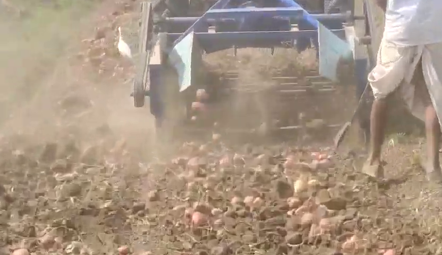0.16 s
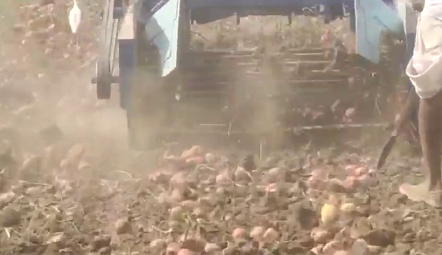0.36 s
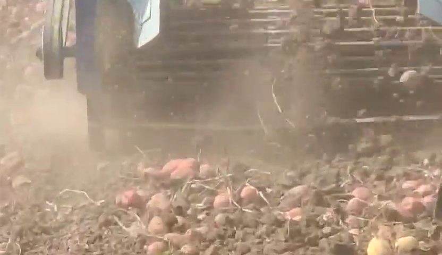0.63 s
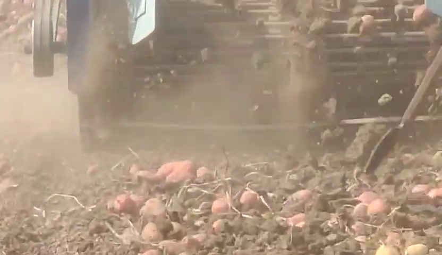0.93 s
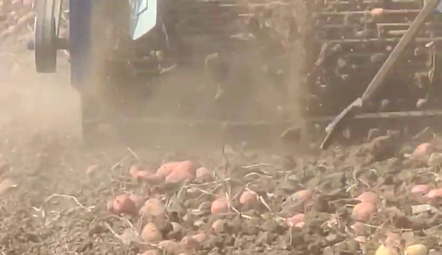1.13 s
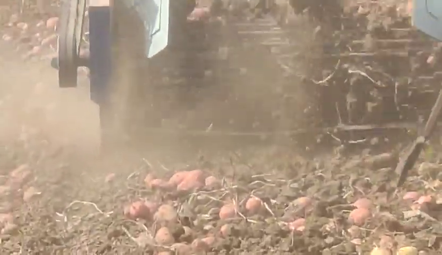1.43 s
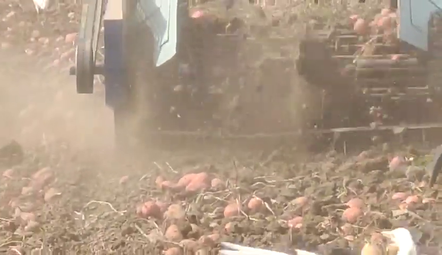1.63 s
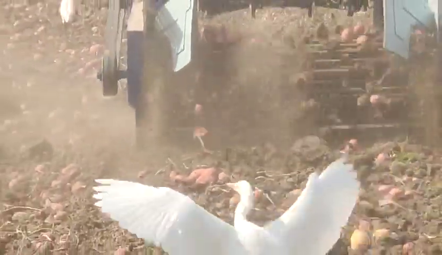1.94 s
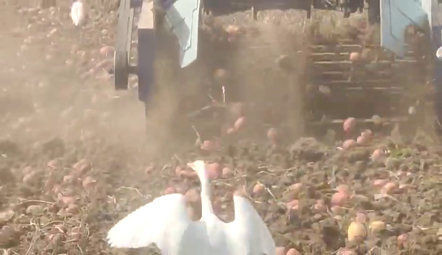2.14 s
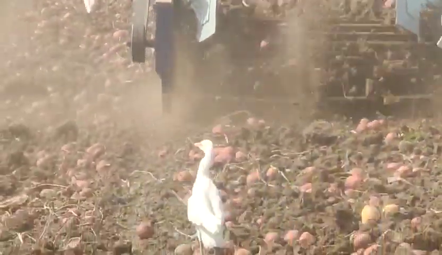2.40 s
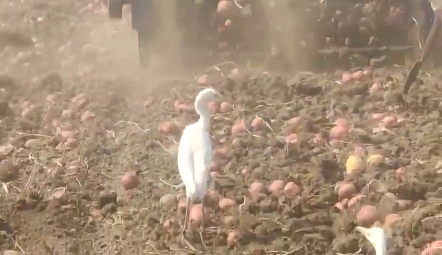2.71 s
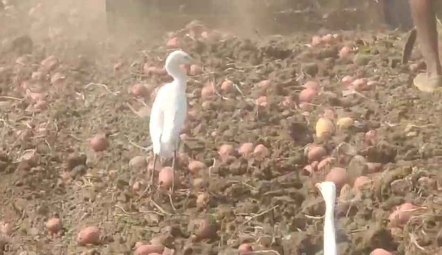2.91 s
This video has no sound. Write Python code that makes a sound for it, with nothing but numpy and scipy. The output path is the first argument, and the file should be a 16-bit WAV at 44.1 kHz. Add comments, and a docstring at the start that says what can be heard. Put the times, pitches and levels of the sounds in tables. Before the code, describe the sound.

A tractor's diesel engine drones low and steady a few metres away for all three seconds, swelling around 0.5 seconds. Its potato digger rattles throughout, with trickling soil and irregular knocks on steel. Short metallic pings come mostly in the first second, and clanks and pattering clods cluster near 2.9 seconds. Light wind rumbles on the microphone, thumping hardest at about 1.3 seconds.

```python
"""Tractor and potato digger

A tractor pulls a potato digger through a dry field, a few metres ahead of the microphone.
The diesel drones at orders of its nearly steady firing rate. Impacts excite the digger's resonances:
its rod chain clatters and pings, clods knock on its steel, and soil trickles through.
A light wind buffets the two microphone ports with turbulent pressure."""
import sys
import numpy as np
from scipy import signal
from scipy.fft import rfft, irfft
from scipy.io import wavfile

SR = 44100
rng = np.random.default_rng(int(sys.argv[2]) if len(sys.argv) > 2 else 0)


def unload_wav(signal):
    """Save mono or channel-first audio to the path in sys.argv[1] as 16-bit WAV at rate SR, clipped to [-1, 1]."""
    wavfile.write(
        sys.argv[1],
        SR,
        np.round(np.clip(np.atleast_2d(signal).T, -1, 1) * 32767).astype(np.int16),
    )


N = 134946

# engine speed (time [s], firing rate [Hz])
FIRING_RATE = [(0, 36.1), (.5, 35.85), (1.3, 35.7), (1.5, 36), (3.06, 36.4)]
def firing_cycles():
    """Phase is the integral of frequency: the count of firings so far."""
    return np.cumsum(curve(FIRING_RATE)) / SR


# exhaust line spectrum (frequency [multiple of the firing rate], relative level [dB])
EXHAUST_ORDERS = [(1, -26), (2, 3), (3, -3), (4, -26.5), (5, -21.5), (6, -41), (8, -34), (8.6, -31.5),
                  (10, -35), (11, -36), (13, -32.5), (14, -31), (16, -28), (20, -31)]
# drone of the three lowest orders (time [s], level [dB])
DRONE_LEVEL = [(0, -45.5), (.1, -46.5), (.19, -55.5), (.25, -42.5), (.44, -38), (.46, -31), (.54, -25.5),
               (.64, -35.5), (.71, -30.5), (.78, -35.5), (.93, -35.5), (1.06, -30), (1.15, -36.5),
               (1.27, -29), (1.37, -38.5), (1.93, -41), (2.07, -35), (2.75, -35.5), (3.06, -38)]
def exhaust(cycles):
    """Periodic gas pulses give a line spectrum: strong low orders, faint unsteady ones above."""
    lines = [amp(db) * np.cos(2 * np.pi * order * cycles) for order, db in EXHAUST_ORDERS]
    low = sum(line * (1 + 0.085 * waver(hz=6.4)) for line in lines[:3])
    high = sum(line * (1 + 0.47 * waver(hz=6.4)) for line in lines[3:])
    return amp(curve(DRONE_LEVEL)) * unit_power(low) + amp(-38) * high


# muffler response (frequency [Hz], relative level [dB])
BOOM_SPECTRUM = [(40, -22.5), (100, -0.5), (140, -1.5), (180, 3), (200, -2.5), (235, -17.5), (400, -27.5),
                 (1000, -59)]
# muffler boom (time [s], level [dB])
BOOM_LEVEL = [(0, -59), (.24, -60.5), (.5, -46.5), (1.1, -51), (1.45, -54), (1.87, -58), (2.15, -48.5),
              (2.53, -57.5), (2.73, -47.5), (3.06, -52)]
def muffler():
    """Cavity resonance shapes noise into a low boom."""
    return excite(amp(curve(BOOM_LEVEL)), BOOM_SPECTRUM)


# response of block and gears (frequency [Hz], relative level [dB])
BLOCK_SPECTRUM = [(30, -16), (90, 2), (185, -2), (245, -11), (310, -10), (410, -11.5), (540, -3),
                  (730, 1.5), (900, -5), (1270, -12), (1700, -8), (1920, -12.5), (2250, -5.5),
                  (2420, -14.5), (2600, -26.5), (4000, -25.5), (15000, -57)]
# mechanical noise (time [s], relative level [dB])
BLOCK_LEVEL = [(0, -53), (.22, -54), (.33, -51), (.45, -54.5), (.8, -55), (.95, -53), (1.1, -53),
               (1.3, -54.5), (1.42, -53.5), (1.6, -53.5), (1.76, -54.5), (1.95, -52.5), (2.1, -55.5),
               (2.5, -56), (2.85, -54), (3.06, -53.5)]
def engine_block(cycles, depth=0.13, gain_db=1):
    """Amplitude modulation: the mechanical noise throbs with each firing."""
    throb = unit_power(1 + depth * np.cos(2 * np.pi * cycles))
    return excite(throb * amp(curve(BLOCK_LEVEL) + gain_db), BLOCK_SPECTRUM)


def rattle(ticks_per_s=280, decay_s=0.0061, trickle_power=1):
    """Shot-noise envelope: random ticks of rods and crumbs add in power to a steady trickle of soil."""
    onsets = rng.random(N) < ticks_per_s / SR
    ticks = onsets * amp(-3.5 * np.minimum(rng.exponential(1, N), 3))
    power = signal.lfilter([1], [1, -np.exp(-2 / (decay_s * SR))], ticks ** 2)
    return unit_power(np.sqrt(power / power.mean() + trickle_power))


# rod chain and trickling soil (frequency [Hz], relative level [dB])
CHAIN_SPECTRUM = [(300, -19), (1200, -5.5), (1700, 1.5), (2000, 2), (2380, 3.5), (2600, -3.5), (2950, -5.5),
                  (3400, -1), (4200, -2), (5200, -3), (5900, -5.5), (6550, -15), (7600, -7), (8500, -12.5),
                  (9500, -16), (11200, -10.5), (12000, -13), (13100, -22), (14700, -15), (16000, -26)]
# their clatter (time [s], relative level [dB])
CHAIN_LEVEL = [(0, -61.5), (.3, -61), (.57, -64.5), (.72, -61.5), (1, -62.5), (1.22, -60.5), (1.45, -61.5),
               (1.72, -62.5), (1.9, -62), (2.15, -63.5), (2.4, -61.5), (2.72, -62), (3.06, -61)]
def rod_chain(envelope, gain_db=1.5):
    """Short, hard contacts excite a broad band of resonances: a bright clatter."""
    return excite(envelope * amp(curve(CHAIN_LEVEL) + gain_db), CHAIN_SPECTRUM)


# clods and rods striking the digger (time [s], relative ring, clack and grit levels [dB], decay [s])
IMPACTS = [(.076, -47.5, -52.5, -65, 0.0068), (0.186, -50, -53.5, -70, 0.01), (.286, -47, -58, -74, .009),
           (.333, -54, -51, -73, 0.01), (0.369, -58, -63, -63, .008), (.486, -63, -57, -75, 0.011),
           (0.622, -63, -56, -61, 0.0041), (0.671, -49, -51.5, -68, 0.027), (0.736, -50, -52.5, -63, 0.02),
           (.761, -49, -72, -78, 0.018), (0.844, -50, -57.5, -71, .008), (0.898, -47, -52.5, -64, 0.016),
           (1.154, -53, -54.5, -66, 0.012), (1.203, -59, -54, -75, 0.012), (1.241, -51, -53.5, -75, 0.0086),
           (1.262, -50, -62, -77, 0.025), (1.3, -63, -52.5, -51.5, 0.012),
           (1.427, -52.5, -54.5, -57, 0.0049), (1.578, -66, -55.5, -73, 0.0056),
           (1.616, -50, -47.5, -63, 0.0039), (1.663, -60, -63, -59, 0.006),
           (1.794, -55, -53.5, -61, 0.0079), (1.82, -53, -63, -63, 0.0069), (1.925, -64, -56.5, -72, .012),
           (2.034, -65, -58, -61, .007), (2.232, -74, -64, -61, 0.0044), (2.269, -52, -56, -66, 0.006),
           (2.326, -53, -61, -73, .01), (2.413, -54, -55.5, -76, .008), (2.594, -50.5, -53.5, -69, 0.016),
           (2.818, -53, -55, -61, 0.0086), (2.856, -53, -49, -59, 0.0049), (2.914, -55, -52, -59, .005),
           (2.926, -51, -47.5, -55, 0.0074), (3.018, -49, -52, -74, .015)]
# steel ring, clack and grit spray, each (frequency [Hz], relative level [dB])
RING_SPECTRUM = [(200, -35), (700, -10.5), (1250, -12), (1660, -6.5), (1900, -15.5), (2110, -2.5),
                 (2230, -11), (2390, -2), (2480, -19.5), (2600, -18.5), (4000, -46)]
CLACK_SPECTRUM = [(1000, -35), (2000, -5), (2900, -6), (3600, 1), (4400, -2), (5100, -2.5), (6000, -7),
                  (6600, -16), (10000, -32)]
GRIT_SPECTRUM = [(3000, -33), (6600, -6), (7600, 3.5), (9000, -6.5), (11200, 0), (13000, -23.5),
                 (15000, -2.5)]
def knocks(rise_s=0.0043):
    """Impact excitation: each crumbling blow rings the steel, clacks and sprays grit."""
    power = np.zeros((3, N))
    for start, ring_db, clack_db, grit_db, decay in IMPACTS:
        gains = amp([[ring_db + 0.5], [clack_db], [grit_db - 0.5]])
        power += (gains * blow(start, rise_s, decay)) ** 2
    spectra = RING_SPECTRUM, CLACK_SPECTRUM, GRIT_SPECTRUM
    return sum(excite(np.sqrt(p), spectrum) for p, spectrum in zip(power, spectra))


# sieve rods striking their guide (time [s], level [dB], frequency [Hz], decay [s])
ROD_STRIKES = [(.232, -54, 2390, 0.023), (0.283, -45.5, 2385, 0.012), (.331, -47, 2400, 0.018),
               (.478, -52, 2420, 0.026), (0.668, -48.5, 2410, 0.023), (0.734, -46, 2350, 0.024),
               (.758, -48.5, 2140, .014), (.936, -55, 2390, .02), (1.264, -52, 2080, 0.021),
               (1.617, -47, 2397, 0.0076)]
def rod_pings(rise_s=0.0033, deviation_hz=64.3):
    """Damped vibration of one mode: a loose rod rings, frequency-modulated as it chatters."""
    pings = np.zeros(N)
    for start, db, hz, decay in ROD_STRIKES:
        cycles = np.cumsum(hz + deviation_hz * waver(hz=172)) / SR
        pings += amp(db) * blow(start, rise_s, decay) * unit_power(np.sin(2 * np.pi * cycles))
    return panned(pings, pan_db=-8)


# clods falling off the sieve (frequency [Hz], relative level [dB])
TUMBLE_SPECTRUM = [(300, -20.5), (800, -2), (1150, -0.5), (1400, -2), (1750, -2.5), (2150, -1.5),
                   (2600, -17.5), (6000, -35)]
# their patter (time [s], level [dB])
TUMBLE_LEVEL = [(0, -61), (.35, -62), (.55, -63), (.95, -63), (1.3, -71), (2.5, -71.5), (2.85, -59),
                (3.06, -57)]
def tumbling_clods(envelope):
    """Soft contacts carry little treble: falling clods patter in the midrange."""
    return excite(envelope * amp(curve(TUMBLE_LEVEL)), TUMBLE_SPECTRUM)


# soft gusts (peak time [s], width [s], relative rumble and flutter levels [dB], left minus right [dB])
WIND_GUSTS = [(0.038, 0.065, -41, -53, 14), (0.105, 0.1, -52, -40.5, -2), (.54, 0.16, -39.5, -45, 5),
              (0.673, 0.13, -37, -45.5, 0), (0.787, 0.13, -39, -45, -7), (0.975, 0.11, -42, -41, -4),
              (1.142, 0.28, -39, -63, 4), (1.302, 0.15, -31.5, -45, -2), (1.525, 0.16, -41, -43.5, -9),
              (1.76, 0.15, -52, -49, -8), (1.96, 0.21, -42, -52, -20), (2.165, 0.27, -42.5, -47, 1),
              (2.401, .14, -38.5, -45, -1)]
# gust pressure, each (frequency [Hz], relative level [dB])
RUMBLE_SPECTRUM = [(10, -51), (24, -30), (33, 4.5), (42, -2.5), (70, 2), (110, -8), (200, -28), (400, -54),
                   (1500, -74)]
FLUTTER_SPECTRUM = [(30, -32), (80, 1.5), (140, 3.5), (185, -2.5), (250, -16.5), (400, -23.5), (900, -45),
                    (3000, -60)]
def gusts():
    """Turbulent pressure rumbles and flutters, swelling and fading as each gust passes."""
    t = np.arange(N) / SR
    rumble, flutter = np.zeros((2, 2, N))
    for peak, width, rumble_db, flutter_db, pan_db in WIND_GUSTS:
        swell = panned(np.exp(-(2 * (t - peak) / width) ** 2), pan_db)
        rumble += (amp(rumble_db) * swell) ** 2
        flutter += (amp(flutter_db) * swell) ** 2
    return turbulence(rumble, RUMBLE_SPECTRUM) + turbulence(flutter, FLUTTER_SPECTRUM)


# sudden buffets (time [s], relative thump and pop levels [dB], left minus right [dB])
WIND_BUFFETS = [(0.446, -32, -59, 7), (.585, -38.5, -71, 4), (.965, -33.5, -55, 6), (1.27, -32.5, -64, 17),
                (1.307, -29.5, -47, 13), (1.344, -38, -51, 9), (1.533, -42.5, -53, -10),
                (1.859, -56, -57.5, -10), (1.878, -57, -50.5, -5), (2.335, -36, -65, -3),
                (2.416, -36, -68, 8)]
# buffet pressure, each (frequency [Hz], relative level [dB])
THUMP_SPECTRUM = [(15, -35), (40, -6), (70, 0.5), (130, 2.5), (190, -6), (250, -17.5), (320, -16.5),
                  (450, -28), (1500, -57.5)]
POP_SPECTRUM = [(100, -14), (300, -4), (550, 4.5), (900, -4.5), (1500, -13), (2600, -25), (8000, -48)]
def buffets(rise_s=0.0039):
    """Pressure transients: air striking the ports gives a low thump and a shorter pop."""
    thump, pop = np.zeros((2, 2, N))
    for start, thump_db, pop_db, pan_db in WIND_BUFFETS:
        thump += panned(amp(thump_db) * blow(start, rise_s, decay_s=0.029), pan_db) ** 2
        pop += panned(amp(pop_db) * blow(start, rise_s, decay_s=0.013), pan_db) ** 2
    return turbulence(thump, THUMP_SPECTRUM) + turbulence(pop, POP_SPECTRUM)


def turbulence(power, spectrum, correlation=0.3, gain_db=-1):
    """Eddies are local, so wind noise is only weakly correlated between the ports."""
    noise = ports(excite(0.95, spectrum), [(100, correlation)])  # alike at all frequencies
    return amp(gain_db) * np.sqrt(power) * noise


# likeness of sound at the two ports (frequency [Hz], correlation [ratio, clipped to 0..1])
PORT_CORRELATION = [(60, -0.5), (200, 1.6), (600, 1.03), (1300, 1.1), (2400, 0.66), (3000, -0.1),
                    (4500, .8), (6500, 0.28), (9000, 0.14), (15000, 0.5)]
# port imbalance (frequency [Hz], left minus right [dB])
PORT_BALANCE = [(60, -3), (400, 2.5), (750, -2), (1200, 1.5), (2000, -1.5), (2400, -2), (3400, 6.5),
                (5000, 0.5), (7200, 0), (10400, -2.5), (15000, 2)]
def ports(x, correlation=PORT_CORRELATION, right_lead_s=12e-6):
    """Partial coherence: two close ports share part of a sound, with level and time differences."""
    hz = np.fft.rfftfreq(N, 1 / SR)
    left, independent = rfft(x)
    shared = np.clip(log_interp(correlation, hz), 0, 1)
    right = shared * left + np.sqrt(1 - shared ** 2) * independent
    right *= np.exp(2j * np.pi * hz * right_lead_s)
    lean = amp(log_interp(PORT_BALANCE, hz) / 2)
    return irfft(np.array([left * lean, right / lean]), N)


def excite(envelope, spectrum, size=8192):
    """Source and filter: two channels of enveloped noise drive a unit-energy, minimum-phase response."""
    hz = abs(np.fft.fftfreq(size, 1 / SR))
    log_gain = np.log(amp(log_interp(spectrum, hz)))
    response = np.exp(np.conj(signal.hilbert(log_gain)))
    ring = np.fft.ifft(response).real[:size // 2]
    drive = envelope * rng.standard_normal((2, N))
    return signal.oaconvolve(drive, ring[None] / np.linalg.norm(ring), axes=1)[:, :N]


def blow(start, rise_s, decay_s):
    """Damping: an exponential decay follows a linear rise."""
    age = np.arange(N) / SR - start
    return np.clip(age / rise_s, 0, 1) * np.exp(-np.maximum(age - rise_s, 0) / decay_s)


def waver(hz):
    """Low-pass noise: a random drift of unit power and bandwidth hz."""
    lowpass = np.exp(-(np.fft.rfftfreq(N, 1 / SR) / hz) ** 2)
    return unit_power(irfft(rfft(rng.standard_normal(N)) * lowpass, N))


def panned(x, pan_db):
    """Constant-power panning; positive is left."""
    return x * unit_power(amp([[pan_db / 2], [-pan_db / 2]]))


def amp(db):
    """Decibels to amplitude ratio."""
    return 10 ** (np.asarray(db) / 20)


def unit_power(x):
    """Normalisation to a mean square of one."""
    return x / np.sqrt(np.mean(x ** 2) + 1e-20)


def curve(points):
    """Linear interpolation in time, at every sample."""
    return np.interp(np.arange(N) / SR, *np.transpose(points))


def log_interp(points, hz):
    """Interpolation on a log-frequency axis."""
    f, value = np.transpose(points)
    return np.interp(np.log(hz + 1), np.log(f + 1), value)


def scene():
    """Superposition of tractor, digger and wind at the microphone."""
    cycles = firing_cycles()
    tractor = exhaust(cycles) + ports(muffler() + engine_block(cycles))
    envelope = rattle()
    digger = ports(rod_chain(envelope) + tumbling_clods(envelope) + knocks()) + rod_pings()
    return tractor + digger + gusts() + buffets()


def record(dry):
    """Band limiting by a linear-phase low-pass filter."""
    lowpass = signal.firwin(511, cutoff=15400, window=("kaiser", 9), fs=SR)
    return signal.oaconvolve(dry, lowpass[None], "same")


dry = scene()
out = record(dry)
unload_wav(out)
```